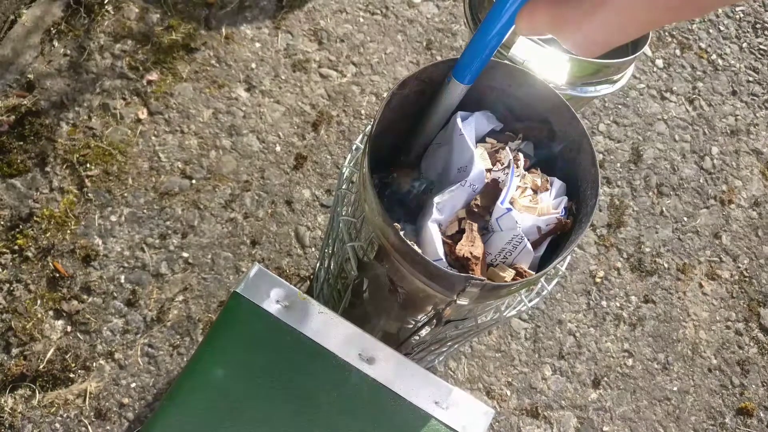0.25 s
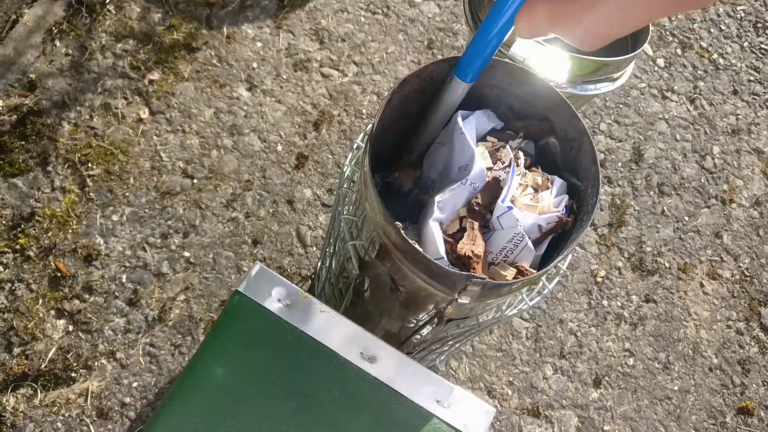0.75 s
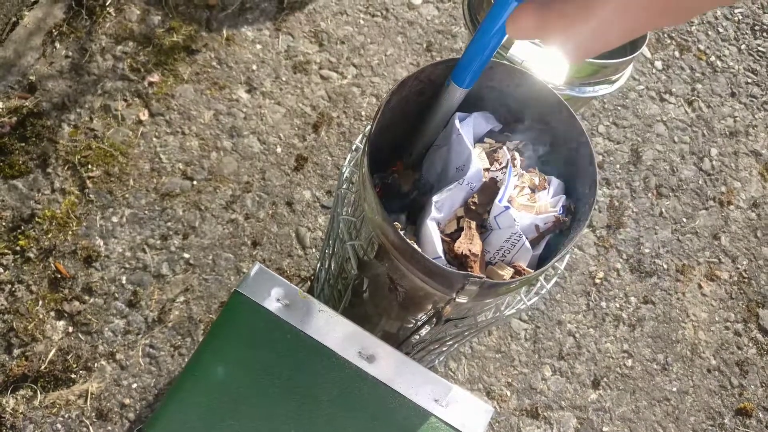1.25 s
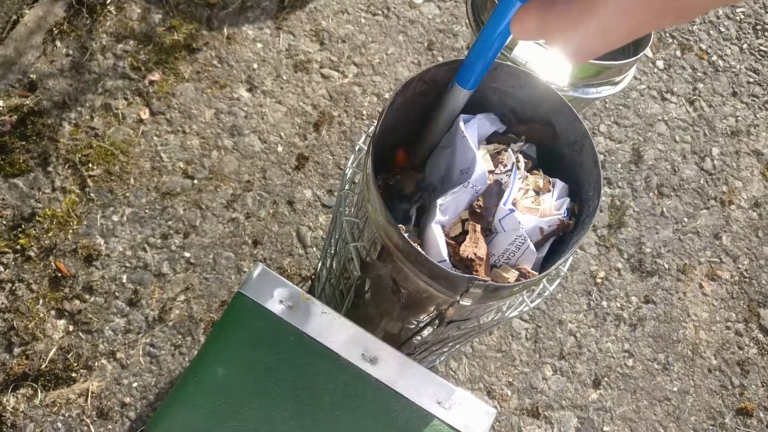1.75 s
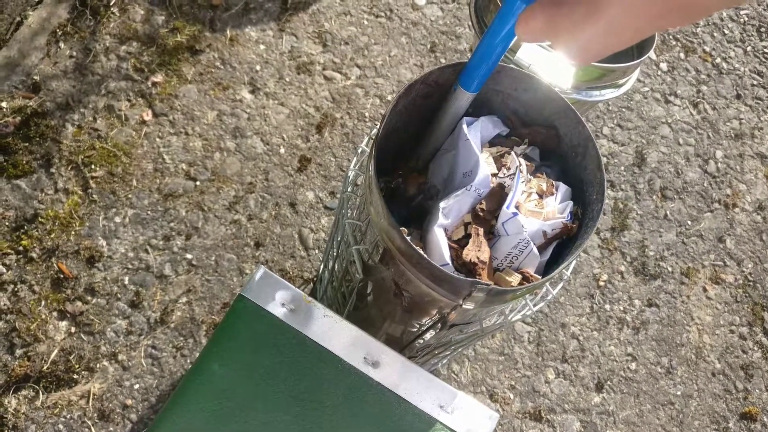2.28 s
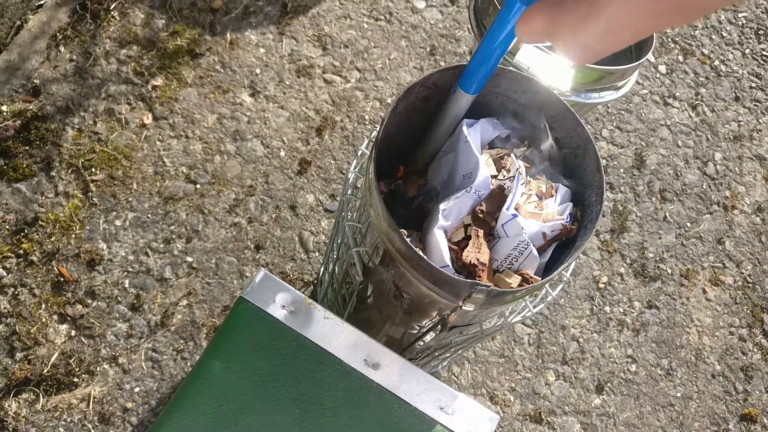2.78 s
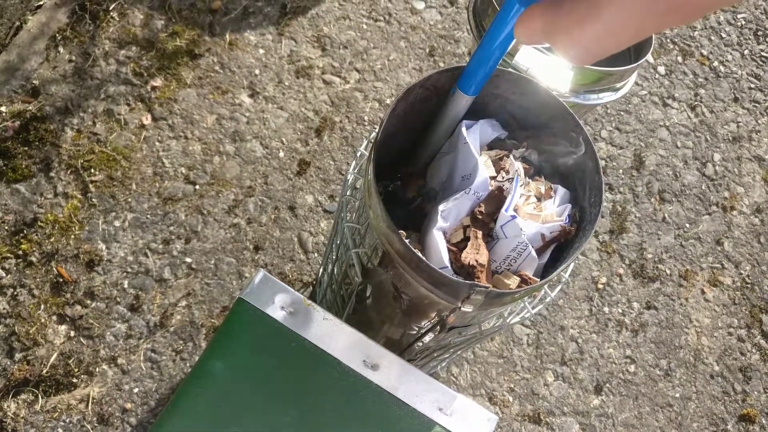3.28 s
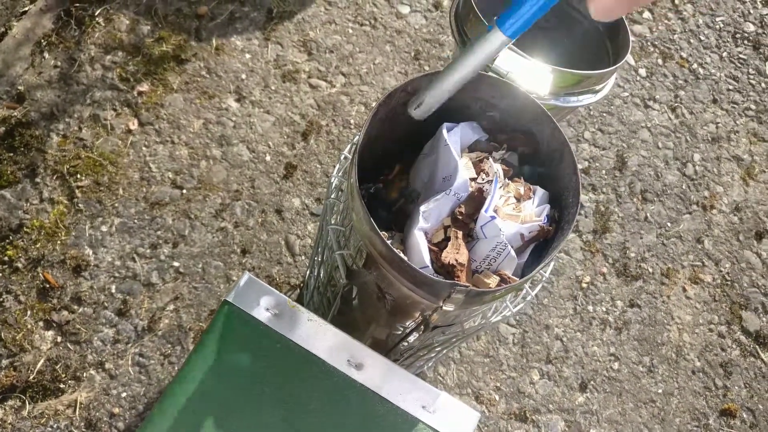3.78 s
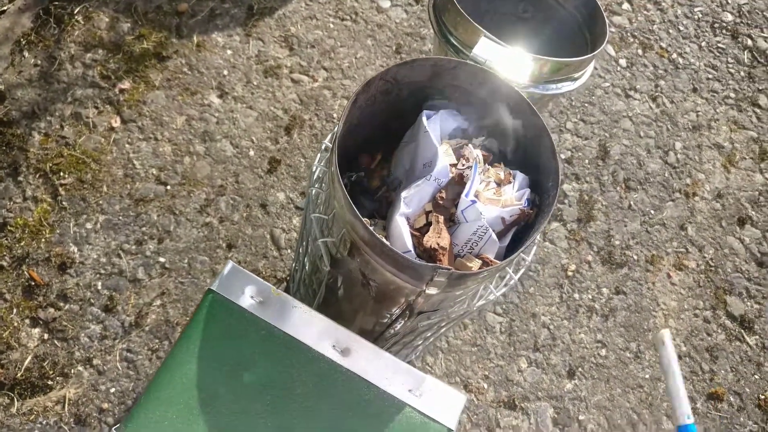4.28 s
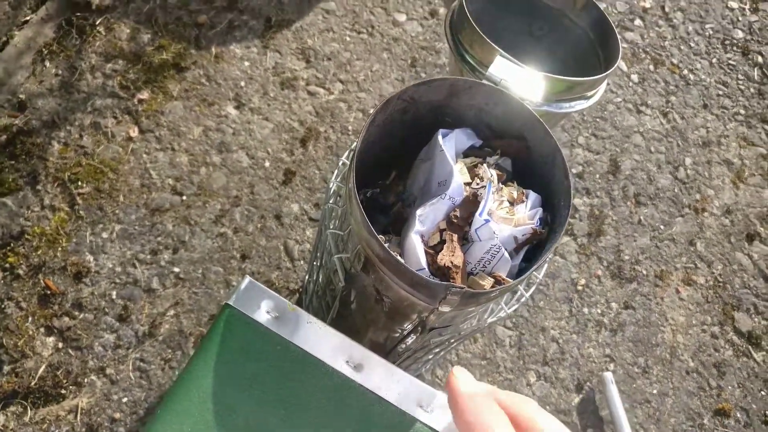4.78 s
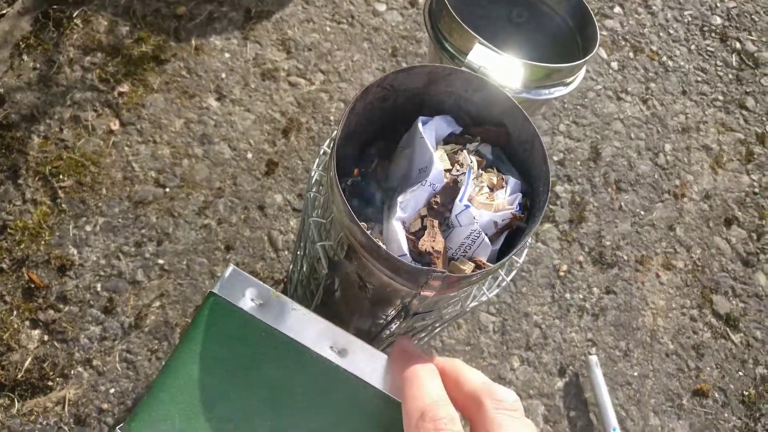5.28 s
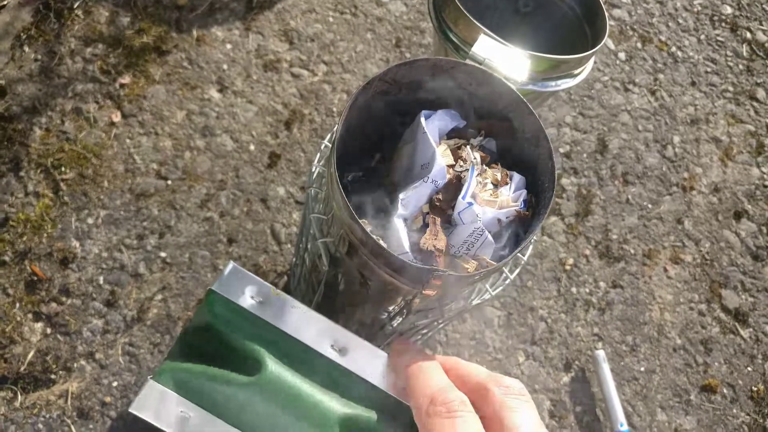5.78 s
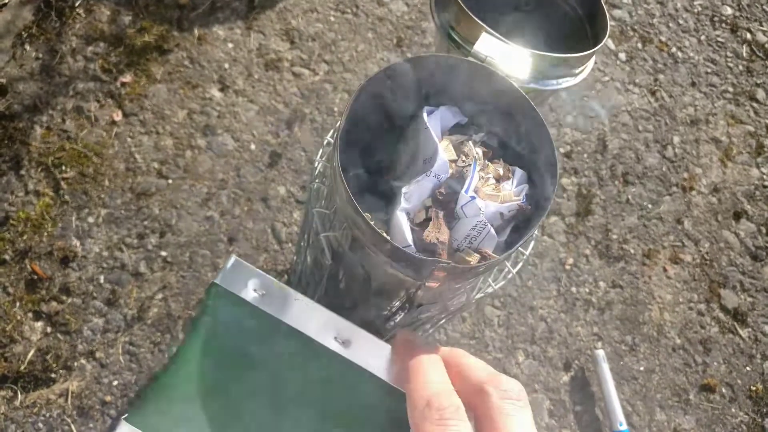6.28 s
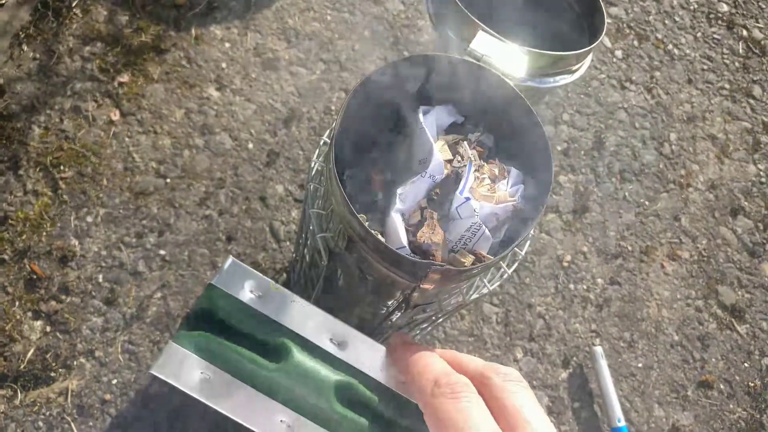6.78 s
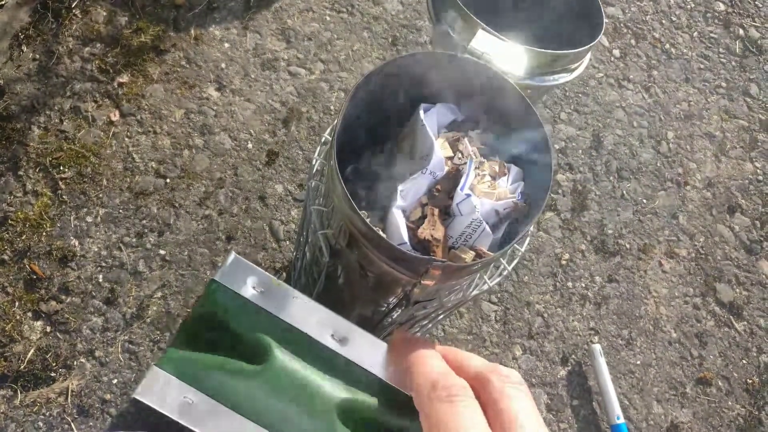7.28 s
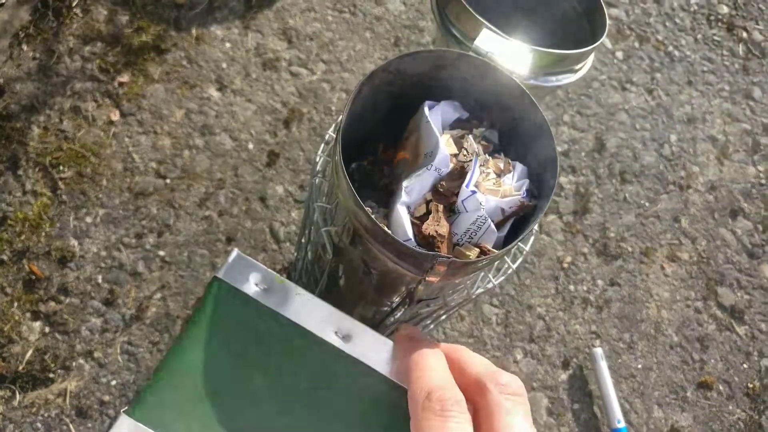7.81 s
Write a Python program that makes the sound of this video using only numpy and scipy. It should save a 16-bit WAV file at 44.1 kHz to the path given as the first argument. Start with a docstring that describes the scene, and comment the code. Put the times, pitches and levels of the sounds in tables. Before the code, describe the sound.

A long lighter clicks and scrapes inside a steel can outdoors in gusty wind, then small bellows puff, hiss and thump softly.

```python
"""Lighting a bee smoker and working its bellows

A long gas lighter clicks and scrapes in a steel can outdoors: short noise cracks, weak tails and grainy friction.
Then the bellows blow softly into the fuel, hiss as they draw air, thump as the skin snaps taut and rattle their spring.
Blows and contacts ring the can through resonances. Random ticks are the smouldering paper.
Gusts buffet the microphone, mostly its left port, as lumpy low noise over a far rustle and rumble."""
import sys
import numpy as np
from scipy import signal
from scipy.fft import rfft, irfft, next_fast_len
from scipy.io import wavfile

SR = 44100
rng = np.random.default_rng(int(sys.argv[2]) if len(sys.argv) > 2 else 0)


def digitize_waveform(pressure):
    """Quantize a signal to 16-bit integers and store it at the path in sys.argv[1].

    Rows of a 2-D input are taken as channels; values are limited to [-1, 1].
    """
    field = np.atleast_2d(pressure).T
    bounded = np.clip(field, -1, 1)
    quanta = np.round(bounded * 32767).astype(np.int16)
    wavfile.write(sys.argv[1], SR, quanta)


N = 355005
TIME = np.arange(N) / SR   # seconds

# the bellows are let go, draw air and snap taut; the thump and spring get a mix gain later:
# snap t/s, intake length/s, intake level at the snap before mixing/dB, thump level before mixing/dB,
# thump f/Hz, second fold against first/dB, spring rattle before mixing/dB, spring rebound before mixing/dB
RELEASES = [(6.3344, .195, -51, -15, 311, -9, -31.5, -37), (7.063, .19, -49.5, -20.5, 292, -5, -34.5, -36),
            (7.7938, .155, -45.5, -15, 316, -15, -33, -33)]


def from_db(db):
    """Turn decibels into a gain."""
    return 10 ** (np.asarray(db) / 20)


def rms_one(x):
    """Scale a sound to an average (rms) level of 1."""
    return x / np.sqrt(np.mean(x ** 2) + 1e-20)


def in_time(rows):
    """Draw straight lines through (time, value) rows, with a value at every sample."""
    return np.interp(TIME, *np.transpose(rows))


def low_pass(x, order, hz):
    """Dull a sound above a cutoff."""
    return signal.sosfilt(signal.butter(order, hz, fs=SR, output="sos"), x + 1e-18)


def colour(x, points):
    """Shape the tone through (Hz, dB) points without pre-echo (minimum phase), falling below the first."""
    size = 2 * next_fast_len(x.shape[-1] // 2 + 2048)
    hz, db = np.transpose(points)
    log_hz = np.log(np.maximum(np.fft.rfftfreq(size, 1 / SR), 1))
    skirt_db = np.clip(25 * (log_hz - np.log(hz[0])), -50, 0)
    curve_db = np.interp(log_hz, np.log(hz), db) + skirt_db
    # folding the cepstrum forward in time gives the minimum-phase filter
    cepstrum = irfft(np.log(from_db(curve_db)))
    cepstrum[1:size // 2] *= 2
    cepstrum[size // 2 + 1:] = 0
    response = np.exp(rfft(cepstrum))
    return irfft(rfft(x, size) * response, size)[..., :x.shape[-1]]


def noise(alike, size=N):
    """Make white stereo noise; alike is the share of power common to both sides."""
    alike = np.clip(alike, 0, 1)
    shared = rng.standard_normal(size)
    separate = rng.standard_normal((2, size))
    return np.sqrt(alike) * shared + np.sqrt(1 - alike) * separate


def drift(rate):
    """Wander randomly around 0, through this many new values per second."""
    knots = rng.standard_normal(N // 8)
    return np.interp(TIME * rate, np.arange(len(knots)), knots)


def swell(start, rise, t60):
    """Rise briefly, then die away by 60 dB in t60 seconds."""
    age = TIME - start
    attack = np.clip(age / max(rise, 1e-4), 0, 1)
    return attack * np.exp(-np.log(1000) * np.clip((age - rise) / t60, 0, 10))


def held(start, end, rise, fall):
    """Stay full between start and end, with rounded flanks."""
    early = np.maximum(start - TIME, 0)
    late = np.maximum(TIME - end, 0)
    return np.exp(-np.minimum((early / rise) ** 2 + (late / fall) ** 2, 20))


def pulse(start, hz, cycles):
    """Make a pressure pulse that swings a few times."""
    turns = np.maximum(TIME - start, 0) * hz
    return np.sin(2 * np.pi * turns) * np.exp(-turns / cycles)


def resonate(x, modes):
    """Ring side-by-side resonances given as (Hz, width in Hz, dB)."""
    out = 0
    for hz, width_hz, db in modes:
        r = np.exp(-np.pi * width_hz / SR)
        poles = [1, -2 * r * np.cos(2 * np.pi * hz / SR), r * r]
        gain = from_db(db) * (1 - r * r) / 2
        out = out + gain * signal.lfilter([1, 0, -1], poles, x + 1e-18)
    return out


def friction(rows, spectrum, grain_db, chatter_db, treble_speed=1):
    """Grainy, chattering contact in bursts, each with its own brightness; the treble may die faster."""
    grip = from_db(grain_db * drift(1200) + chatter_db * drift(180))
    grains = rms_one(colour(noise(0.48) * grip, spectrum))
    treble = signal.sosfiltfilt(signal.butter(2, 6500, "high", fs=SR, output="sos"), grains)
    body_power, treble_power = 0, 0
    for s, db, rise, t60, treble_db in rows:
        body_power = body_power + (from_db(db) * swell(s, rise, t60)) ** 2
        treble_swell = swell(s, rise, t60 / treble_speed)
        treble_power = treble_power + (from_db(db + treble_db) * treble_swell) ** 2
    return (grains - treble) * np.sqrt(body_power) + treble * np.sqrt(treble_power)


def airflow(flow, jet, flutter_db):
    """The hiss of a turbulent jet follows the flow and flutters."""
    return flow * rms_one(jet) * from_db(flutter_db * drift(160))


def outdoors(air_db, rumble_db, hiss_db):
    """Far rustle over a low steady rumble and faint microphone hiss, all filtered noise."""
    # distant rustle: t/s, level before air_db is added/dB
    air_level = [(0, -69.5), (.6, -66.5), (1.3, -64), (1.8, -70), (2.6, -69), (3.4, -69.5), (4.0, -62.5),
                 (4.9, -63), (5.35, -67), (8.05, -67)]
    # tone of the rustle: f/Hz, gain/dB
    air_colour = [(400, -8), (550, -4.5), (750, -4), (1050, -1), (1600, -6), (2400, -9), (4000, -14),
                  (5500, -17.5), (7500, -21.5), (16000, -22)]
    # tone of the rumble: f/Hz, gain/dB
    rumble_colour = [(40, -5.5), (55, 4), (86, -7.5), (124, -2.5), (174, -2.5), (330, -9), (410, -25),
                     (600, -56)]
    # tone of the microphone's own hiss: f/Hz, gain/dB
    hiss_colour = [(6000, -14), (8000, -5), (10500, 7), (13000, 7), (15500, 8.5)]
    air = from_db(in_time(air_level) + air_db) * rms_one(colour(noise(0.16), air_colour))
    rumble = from_db(rumble_db) * rms_one(colour(noise(.85), rumble_colour))
    side_db = np.array([[-1], [1]])   # a little more hiss on the right
    hiss = from_db(hiss_db + side_db) * rms_one(colour(noise(.1), hiss_colour))
    return air + rumble + hiss


def wind(lumpy_db, eddy_db):
    """Lumpy low turbulence: gusts over a light breeze, shared unevenly between the ports."""
    # gusts at the microphone: start t/s, length/s, level/dB, left over right/dB
    gusts = [(0, .12, -35, 24), (.21, .18, -32, 30), (.42, .06, -42, 6), (.58, .07, -46, 0),
             (.79, .03, -42, 22), (1.03, .11, -35, 26), (1.2, .02, -34, -3), (1.28, .05, -39, 28),
             (1.85, .02, -38, 24), (1.95, .03, -44, 20), (2.12, .06, -41, 20), (2.21, .18, -30.5, 28),
             (2.44, .07, -33, 2), (2.6, .04, -40, 5), (2.83, .15, -40, 5), (3.11, .04, -44, 16),
             (3.62, .17, -32.5, 30), (3.81, .09, -27, 13), (3.99, .04, -33, 8), (4.08, .19, -42.5, 3),
             (4.43, .1, -43, 12), (4.78, .05, -43, 17)]
    # single eddies that hit the left port: t/s, level before eddy_db is added/dB, f/Hz
    eddy_hits = [(.221, -19, 111), (0.343, -16, 120), (0.365, -13.5, 167), (1.135, -24, 273),
                 (1.318, -21, 70), (2.217, -20, 69), (3.807, -25, 81.4), (4.041, -23, 190),
                 (4.512, -20.5, 81)]
    # tone of the turbulence: f/Hz, gain/dB
    wind_colour = [(30, -18), (45, 3), (62, 6), (95, 2.5), (140, -5), (220, -14.5), (330, -33), (500, -45),
                   (900, -68)]
    gust_rise_s, gust_fall_s = .03, .045
    # the light breeze drops late on and leaves the calm; levels at the (left, right) port
    breeze_db, breeze_end_s, breeze_fall_s = (-52, -64), 4.65, .3
    calm_db = (-57.5, -68)
    draught_db = -2   # each squeeze also wafts air at the microphone

    breeze = from_db(breeze_db)[:, None] * held(0, breeze_end_s, gust_rise_s, breeze_fall_s)
    calm = from_db(calm_db)[:, None]
    draught = from_db(draught_db) * squeeze_flow()
    power = breeze ** 2 + calm ** 2 + draught ** 2
    for s, length, db, pan_db in gusts:
        share = from_db(pan_db * np.array([[1], [-1]]))
        gust = from_db(db) * held(s, s + length, gust_rise_s, gust_fall_s)
        power = power + share / share.sum() * gust ** 2
    lumps = from_db(lumpy_db * drift(40))
    buffet = rms_one(colour(noise(0.34) * lumps, wind_colour))
    eddies = sum(from_db(db + eddy_db) * pulse(s, hz, 0.67) for s, db, hz in eddy_hits)
    left_only = [[1], [0]]
    return np.sqrt(power) * buffet + low_pass(eddies, 2, 350) * left_only


def paper_ticks(level_db, spread_db):
    """The smouldering paper gives tiny ticks of random size at random moments."""
    # how busily the burning paper ticks: t/s, ticks per second
    burning = [(0, 4), (1.2, 5), (1.4, 22), (2.7, 24), (4.5, 5), (6.6, 26)]
    # tone of the ticks: f/Hz, gain/dB
    tick_colour = [(1200, -17), (2200, 1.5), (6000, -8.5), (10000, -5), (15500, -2)]
    born = rng.random(N) < in_time(burning) / SR
    sizes = from_db(level_db + spread_db * np.minimum(rng.exponential(1, N), 3))
    decay_s = 0.00079
    bursts = signal.lfilter([1], [1, -np.exp(-1 / (decay_s * SR))], born * sizes + 1e-18)
    return colour(noise(.7) * bursts, tick_colour)


def finger_slides():
    """Fingers slide on the lighter and the bellows, a grainy friction noise."""
    # slides: t/s, level/dB, rise/s, t60/s, treble against the rest/dB
    slides = [(3.345, -67, 0.028, 0.47, -1), (4.93, -58, 0.065, .4, 1), (5.012, -46.5, 0.025, 0.099, 6.5),
              (5.16, -66, 0.0095, 0.35, 3.5)]
    # tone of the slides: f/Hz, gain/dB
    slide_colour = [(400, -18), (1500, -6), (2200, -2), (3000, -7), (7000, -19), (10500, -14), (13000, -4),
                    (15500, -11.5)]
    return friction(slides, slide_colour, grain_db=2.5, chatter_db=1.2)


def lighter_trigger():
    """The lighter's trigger slides and gas spurts, as bursts of grainy noise."""
    # bursts: t/s, level/dB, rise/s, t60/s, treble against the rest/dB
    bursts = [(1.224, -28, .003, 0.15, -10.5), (4.095, -55.5, .005, 0.47, 7), (4.14, -43.5, 0.02, 0.3, 1.5)]
    # tone of the bursts: f/Hz, gain/dB
    trigger_colour = [(400, -11), (800, -11), (1500, -5.5), (3000, -8), (5200, 1.5), (6500, -9.5),
                      (10000, -11.5), (15500, -7.5)]
    return friction(bursts, trigger_colour, grain_db=1.5, chatter_db=2.5)


def clicks(rise_ms, tail_t60, contact_width_hz, contact_db):
    """Each contact is a crack of a few milliseconds and a weak tail; returns cracks and tails."""
    # lighter clicks, taps and creasing skin: t/s, level/dB, knock (bass) gain/dB, treble gain/dB,
    # left over right/dB, contact f/Hz, decay time/ms
    contacts = [(0.5125, -33, -22, -4.5, -1, 2470, 1.4), (0.536, -38.5, 7.5, -3, 1, 1570, 1.4),
                (0.5766, -37, 0.5, -7, -4, 2010, 1.9), (0.5912, -33.5, 8, 0.5, 0.5, 1970, 2.5),
                (0.7006, -33.5, -8.5, -7, -2, 2070, 0.9), (0.7071, -38.5, 11, -10, -1, 1880, 1.8),
                (0.8522, -24.5, -2, 2, 2, 2530, 3), (1.0978, -36.5, -2.5, 5, -5, 1940, 1.7),
                (1.1199, -38, 7.5, 6, -7, 1830, 0.9), (1.1284, -34.5, 8.5, -2, 0, 2130, 1.4),
                (1.2191, -18.5, 1.5, 4.5, 5.5, 3800, 4), (1.2221, -18.5, 1, 2, -7.5, 2040, 2.6),
                (1.8891, -52, 11.5, -20, 1, 1550, 1.4), (1.9431, -49, 12.5, -5, -1, 1660, 1.7),
                (2.3445, -42.5, 11, -9.5, -0.5, 2040, 3.1), (3.3468, -38.5, -9.5, 20, -2.5, 2020, 1.1),
                (3.3771, -44, 2.5, 3, -4, 1620, 1.4), (3.5765, -39.5, -2.5, 9, 1.5, 2990, 2.3),
                (3.7997, -23.5, 1, 3, 2, 2520, 2.1), (3.9746, -46.5, 10, -10, 8, 1520, 1.1),
                (4.089, -17.5, -14, 1.5, 3.5, 3550, 1.6), (4.138, -20.5, -20, -11.5, 4, 3600, 2.3),
                (4.4419, -17, -8, 2, -0.5, 2840, 1.2), (4.5312, -29, 7.5, -4.5, -3, 1670, 2.2),
                (4.5417, -23, 1.5, -4.5, 3.5, 1630, 2.6), (4.781, -43.5, 4.5, -8.5, -5.5, 1850, 1.6),
                (4.853, -39, -17.5, 7, 4, 1980, 1.2), (6.5066, -41, 13, 5, 5, 2160, 1.4),
                (6.6187, -44, 5.5, -2, -6, 2180, 1.4), (7.214, -29.5, -2.5, -4.5, -5, 2980, 1.85),
                (7.4375, -38.5, -5.5, -2.5, -3, 1720, 0.8)]
    # tone shared by the clicks: f/Hz, gain/dB
    click_colour = [(200, -16), (600, -5.5), (1200, 2), (2000, 4), (3200, 1.5), (5200, 4), (6800, -3),
                    (8200, -1.5), (9000, 6), (10200, 2.5), (13000, -2), (15500, -1.5)]
    # the harder the contact, the more of it goes into the crack and the less into the tail
    medium_click_db, tail_db, tail_loss_db_per_db = -35, -21, .25

    size = SR // 3
    seconds = np.arange(size) / SR
    ms = 1000 * seconds
    cracks, tails = np.zeros((2, 2, N + size))
    hz, base_db = np.transpose(click_colour)
    for s, db, knock_db, treble_db, pan_db, contact_hz, decay_ms in contacts:
        tilt_db = np.interp(np.log(hz), np.log([900, 1800, 5500, 8500]), [knock_db, 0, 0, treble_db])
        spectrum = np.c_[hz, base_db + tilt_db]
        attack = np.minimum(ms / rise_ms, 1) ** 2
        shape = attack * np.exp(-np.maximum(ms - rise_ms, 0) / max(decay_ms, .2))
        crack = colour(noise(0.68, size=size) * shape, spectrum)
        # the struck part rings briefly
        crack = crack + resonate(crack, [(contact_hz, contact_width_hz, contact_db)])
        crack *= np.sqrt(2 * np.sum(shape ** 2) / np.sum(crack ** 2))   # colour leaves the energy alone
        ring_db = tail_db - tail_loss_db_per_db * (db - medium_click_db)
        tail = rms_one(colour(noise(0.58, size=size), spectrum))
        tail = tail * from_db(ring_db - 60 * seconds / tail_t60)
        gain = from_db(db + pan_db * np.array([[.5], [-.5]]))
        at = int(s * SR)
        cracks[:, at:at + size] += gain * crack
        tails[:, at:at + size] += gain * tail
    return cracks[:, :N], tails[:, :N]


def can_ring(contact):
    """The can's steel wall rings at its own pitches when it is touched or blown through."""
    # modes of the steel can: f/Hz, width/Hz, gain/dB
    can_modes = [(310, 83, -12.5), (570, 50, -9), (917, 16, 5.5), (1073, 21.3, -5), (1132, 22, 2),
                 (1222, 40, -1.5), (1654, 21, 0.5), (2010, 29, -4.5), (2110, 36, -1), (2310, 18, 1),
                 (2826, 33, 3), (2930, 11, 4), (3367, 24.5, 3), (3884, 27, -9), (5233, 30, -6),
                 (9360, 90, -26), (11520, 40, -4.5)]
    return resonate(contact, can_modes)


def spring_bursts():
    """Every snap shakes the spring twice: rows of (s, dB before mixing, rise s, t60 s, treble dB)."""
    # the rattle after a snap: delay/s, rise/s, t60 of the body/s, treble against the rest/dB
    first_rattle = (.011, .0022, .28, -3.5)
    # the rebound after a snap: delay/s, rise/s, t60 of the body/s, treble against the rest/dB
    rebound = (.039, .0024, .105, 5)
    rows = []
    for snap, *_, rattle_db, rebound_db in RELEASES:
        for db, (delay, *shape) in ((rattle_db, first_rattle), (rebound_db, rebound)):
            rows.append((snap + delay, db, *shape))
    return rows


def rattles():
    """Scrapes, shifts, creases and the bellows' spring: grainy bursts whose treble dies faster."""
    # lighter scrapes, the ignition click's rattling ring, can shifts and creasing bellows skin:
    # t/s, level before mixing/dB, rise/s, t60 of the body/s, treble against the rest/dB
    contact_bursts = [(.995, -56, 0.0081, 0.15, -2), (1.07, -57.5, 0.0083, 0.18, 2.5),
                      (1.107, -51, .003, 0.088, 5), (1.118, -46.5, 0.0081, 0.09, 2),
                      (1.224, -37, 0.0013, 0.28, -6), (1.36, -58.5, 0.022, 0.2, 6),
                      (1.50, -58, .005, 0.22, -2), (3.35, -61, 0.023, 0.35, 5),
                      (4.605, -55.5, 0.007, 0.18, -3), (5.797, -55, 0.0063, 0.095, -1.5),
                      (7.298, -55, 0.0068, .12, 8), (7.354, -55, .002, .15, 4)]
    # tone of the rattles: f/Hz, gain/dB
    rattle_colour = [(150, -8), (310, 2), (420, -5), (600, -16.5), (800, -9), (1200, -8), (2300, -4.5),
                     (3000, -10.5), (4500, -8), (5700, -11), (7500, -16.5), (10000, -9), (13000, -15.5),
                     (16000, -14.5)]
    rows = [*contact_bursts, *spring_bursts()]
    return friction(rows, rattle_colour, grain_db=1.5, chatter_db=2.0, treble_speed=1.3)


def squeeze_flow():
    """The hand speeds up and slows down again; the jet follows it."""
    # the bellows blow into the fuel: start t/s, hardest t/s, end t/s, level at the hardest/dB
    squeezes = [(5.72, 6.02, 6.09, -57), (6.43, 6.62, 6.84, -50), (7.15, 7.28, 7.54, -49.5),
                (7.96, 8.04, 8.3, -46)]
    hiss_exponent = 1.15   # the hiss grows as this power of the speed of the hand
    flow = 0
    for start, hardest, end, db in squeezes:
        hand_speed = np.interp(TIME, [start, hardest, end], [0, 1, 0])
        flow = flow + from_db(db) * hand_speed ** hiss_exponent
    return flow


def bellows_blow():
    """Squeezed air hisses softly out of the nozzle into the fuel."""
    # tone of the blow: f/Hz, gain/dB
    blow_colour = [(120, -27), (200, -7), (330, 2.5), (410, -18), (456, -21.5), (1000, -2.5), (1180, -14),
                   (1980, -8.5), (3160, -13), (3520, -16), (5130, -19.5), (6030, -31), (9950, -24),
                   (14500, -25)]
    nozzle = colour(noise(0.53), blow_colour)
    return airflow(squeeze_flow(), nozzle, flutter_db=1.5)


def intake_flow():
    """The spring opens the bellows ever faster, until the skin stops them."""
    rise_s, release_s = .09, .04
    growth_db_per_s = 26   # the spring speeds the board up as it opens
    flow = 0
    for snap, length, db, *_ in RELEASES:
        opening = np.clip((TIME - snap + length) / rise_s, 0, 1)
        growth_db = growth_db_per_s * np.minimum(TIME - snap, 0)
        stop = np.exp(-(np.maximum(TIME - snap, 0) / release_s) ** 2)
        flow = flow + from_db(db + growth_db) * opening * stop
    return flow


def bellows_draw():
    """Air hisses in through the inlet, which also sings faintly."""
    # tone of the intake: f/Hz, gain/dB
    draw_colour = [(290, -27), (500, -21), (718, -20.5), (1230, -20), (1510, -6.5), (1770, -10.5),
                   (2330, -5.5), (3250, -19), (3810, -12), (4730, -11.5), (5310, -25), (7000, -13),
                   (8210, -29.5), (10800, -12.5), (16000, -21)]
    # resonances of the air inlet: f/Hz, width/Hz, gain before mixing/dB
    inlet_modes = [(2320, 350, -5), (10200, 490, -1.5)]
    singing = from_db(-8.0) * resonate(noise(0.27), inlet_modes)
    inlet = colour(noise(0.46), draw_colour) + singing
    return airflow(intake_flow(), inlet, flutter_db=0.6)


def thumps(cycles, second_pitch, lowest_hz, soft_hz, board_hz, board_db, slap_hz, slap_db, left_lag_s):
    """Two folds of skin slap taut one after another and jolt the boards; the puff arrives right first."""
    second_slap_s = .0062
    # a softer snap is duller, but the boards are jolted just as much
    hard_snap_db, slap_loss_db_per_db = -15, .9
    out = 0
    for s, _, _, db, hz, second_db, *_ in RELEASES:
        start = s + np.array([[left_lag_s], [0]])
        first_fold = pulse(start, hz, cycles)
        second_fold = from_db(second_db) * pulse(start + second_slap_s, hz * second_pitch, cycles)
        softer_db = hard_snap_db - db
        slap_gain = from_db(slap_db - slap_loss_db_per_db * softer_db)
        slap = slap_gain * pulse(start + .5 / slap_hz, slap_hz, cycles)
        boards = from_db(board_db + softer_db) * pulse(start, board_hz, cycles * .5)
        out = out + from_db(db) * (first_fold + second_fold + slap + boards)
    # small boards radiate no deep bass
    out = signal.sosfilt(signal.butter(2, lowest_hz, "high", fs=SR, output="sos"), out + 1e-18)
    return low_pass(out, 6, soft_hz)


def ports(x, count=3):
    """Near sounds reach the right port a few samples earlier and mostly brighter."""
    # balance of the two microphone ports: f/Hz, right over left/dB
    port_balance = [(20, 0), (400, 0), (1000, 6), (2200, 4), (3500, 0), (6000, 0), (7500, 8), (9200, 19),
                    (11000, 16), (13000, 10), (15500, 4)]
    hz, right_db = np.transpose(port_balance)
    left_db = 20 * np.log10(2 / (1 + from_db(right_db)))   # the mean of both ports stays flat
    left = colour(x[0], np.c_[hz, left_db])
    right = colour(x[1], np.c_[hz, left_db + right_db])
    late_left = np.r_[np.zeros(count), left[:-count]]
    return np.array([late_left, right])


def scene():
    """Mix lighter, can and bellows close by, in the open air."""
    background = outdoors(air_db=2.0, rumble_db=-62, hiss_db=-75.5)
    gusty = wind(lumpy_db=3.0, eddy_db=3.5)
    fuel = paper_ticks(level_db=-67.0, spread_db=6.5)
    fingers = finger_slides()
    trigger = lighter_trigger()
    cracks, tails = clicks(rise_ms=0.76, tail_t60=0.13, contact_width_hz=165, contact_db=8.5)
    rattle = rattles()
    blow = bellows_blow()
    draw = bellows_draw()
    thump = from_db(1.5) * thumps(cycles=1.5, second_pitch=0.65, lowest_hz=56, soft_hz=1050,
                                  board_hz=129, board_db=-8.5, slap_hz=753, slap_db=-8.0,
                                  left_lag_s=0.00025)
    # contacts and air drive the can's wall by different amounts
    touch = from_db(9.0) * rattle + from_db(5.0) * tails + from_db(-8.0) * trigger
    breath = from_db(-6.5) * blow + from_db(2.0) * draw
    steel = can_ring(touch + breath)
    contacts = cracks + tails + trigger + fingers
    bellows = blow + draw + thump
    near = contacts + from_db(-1.0) * rattle + bellows + steel + fuel
    return ports(near) + gusty + background


def record(dry):
    """Cut the deepest bass and the top treble steeply."""
    cutoff_hz = 15900
    thinned = signal.sosfilt(signal.butter(4, 36, "high", fs=SR, output="sos"), dry)
    return signal.sosfilt(signal.ellip(10, .2, 70, cutoff_hz, fs=SR, output="sos"), thinned)


dry = scene()
out = record(dry)
digitize_waveform(out)
```